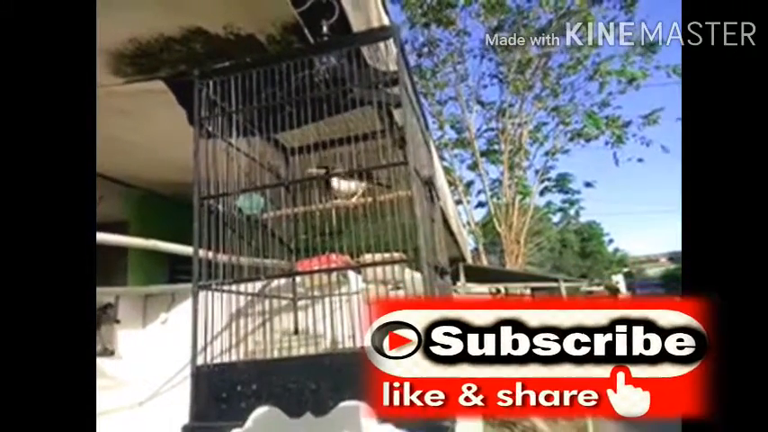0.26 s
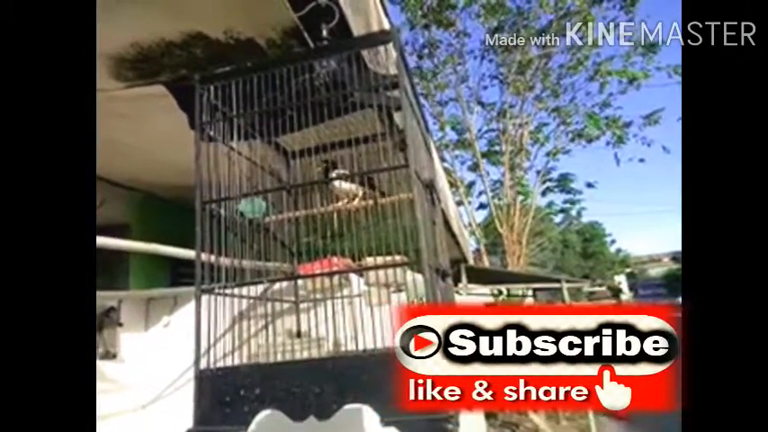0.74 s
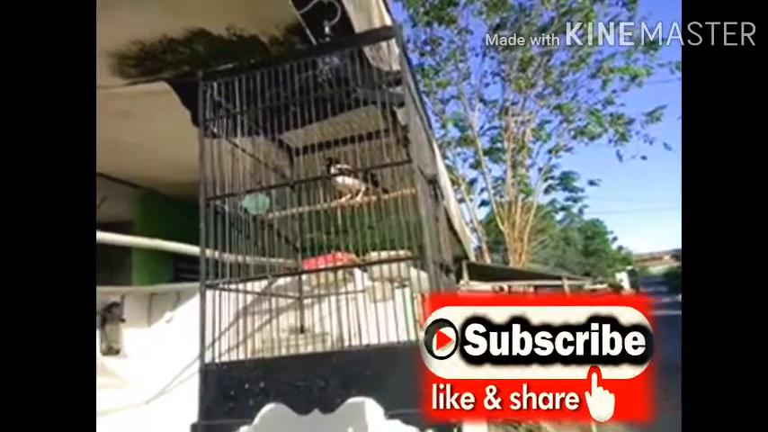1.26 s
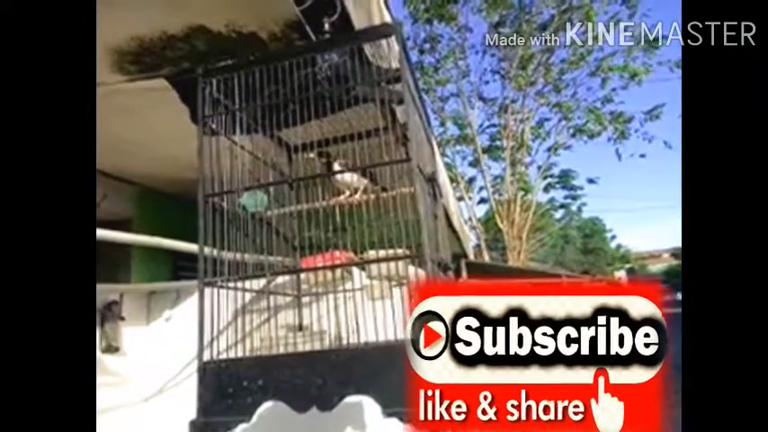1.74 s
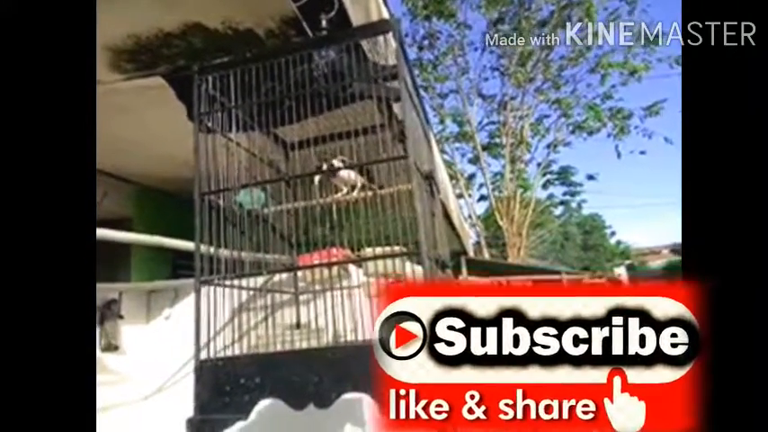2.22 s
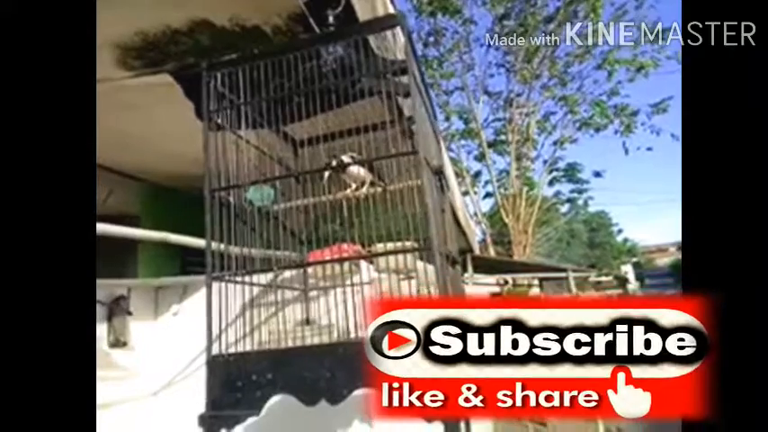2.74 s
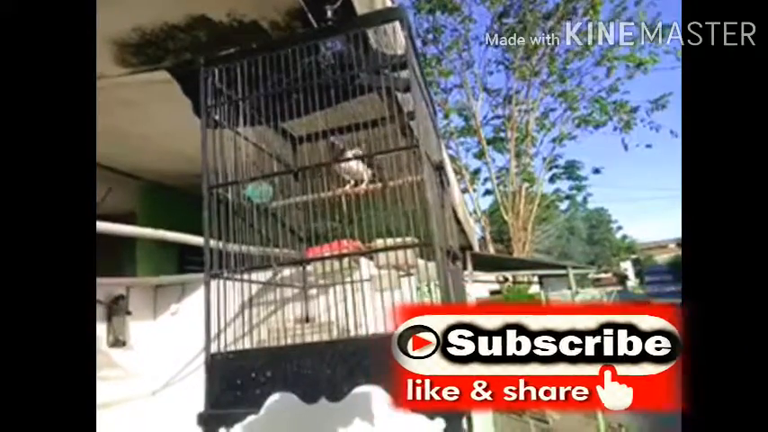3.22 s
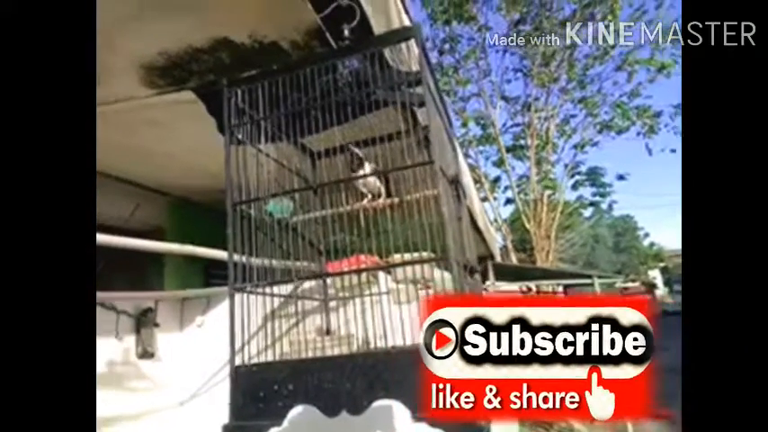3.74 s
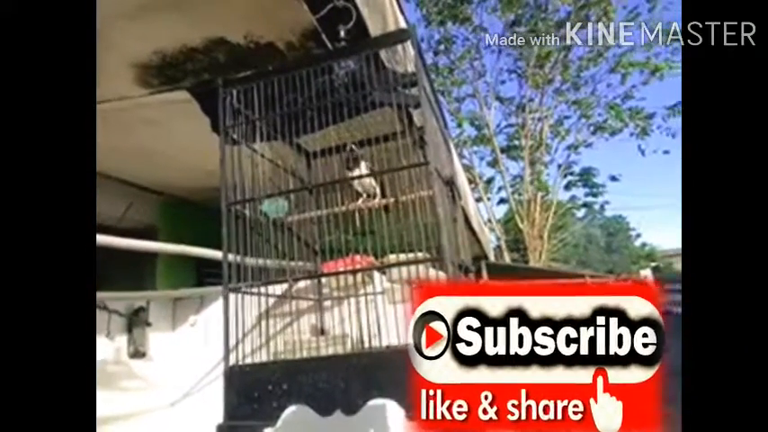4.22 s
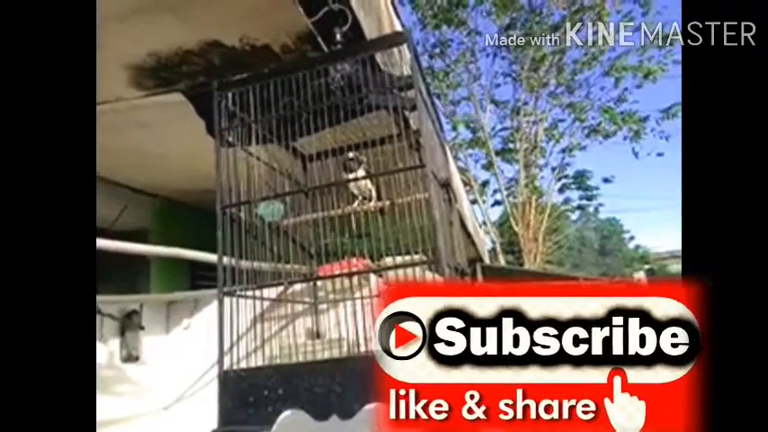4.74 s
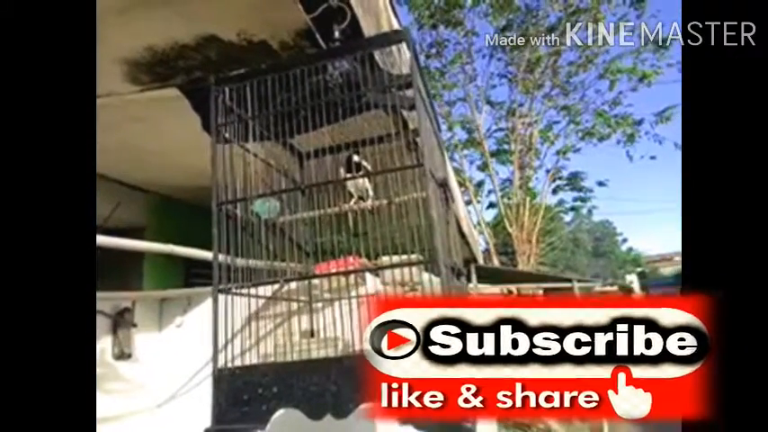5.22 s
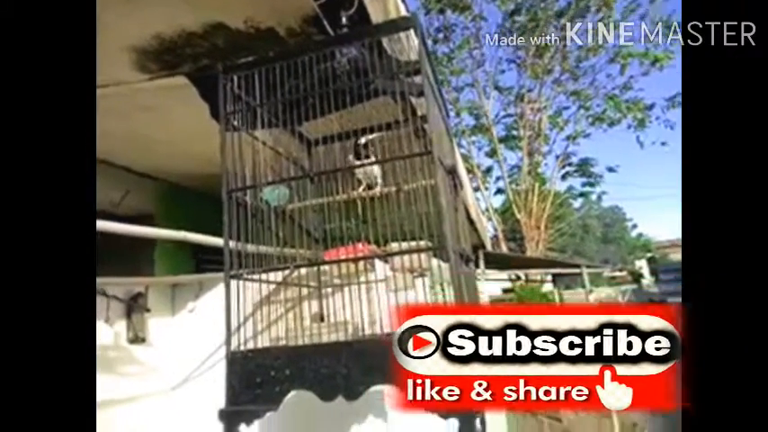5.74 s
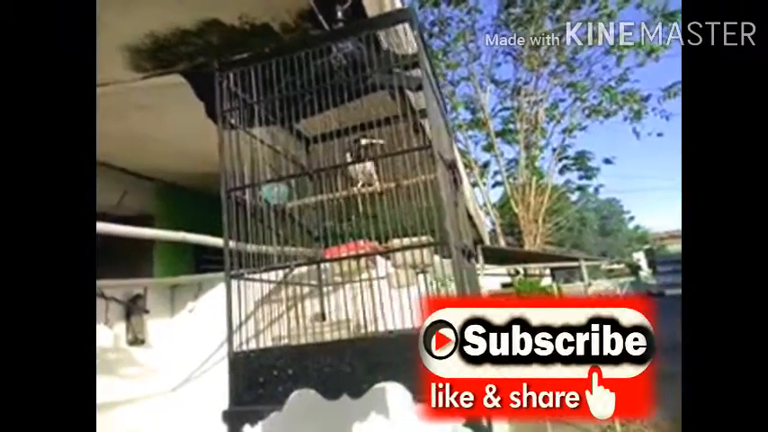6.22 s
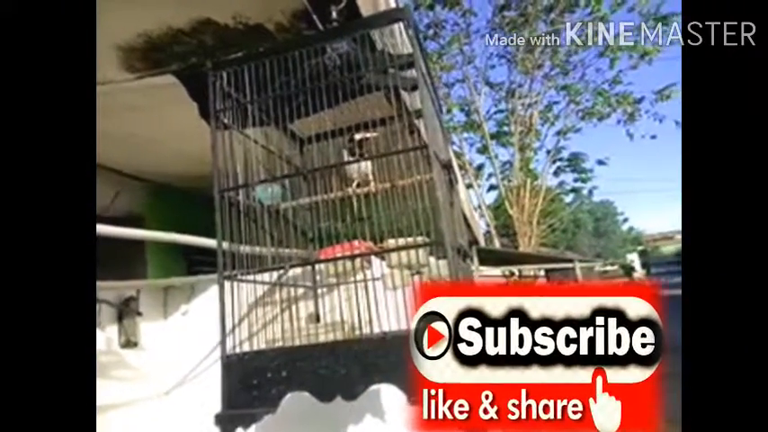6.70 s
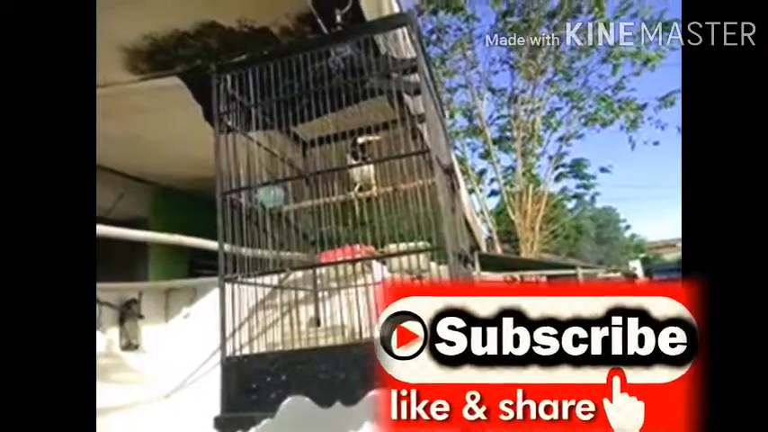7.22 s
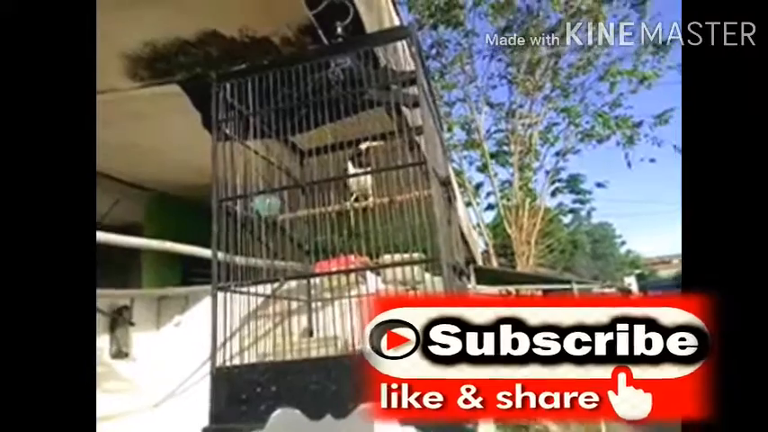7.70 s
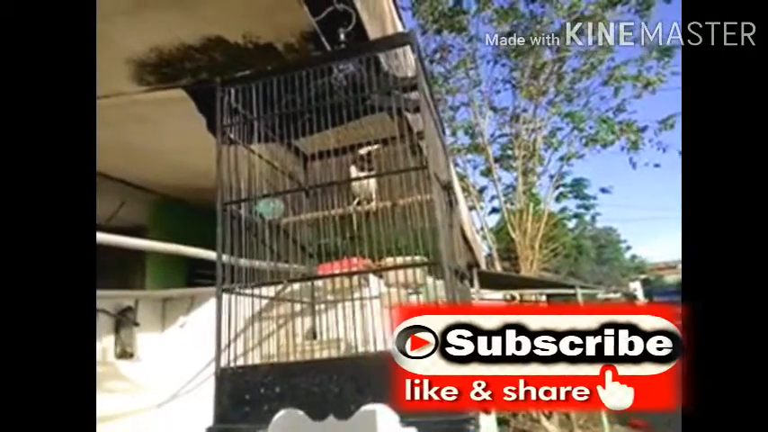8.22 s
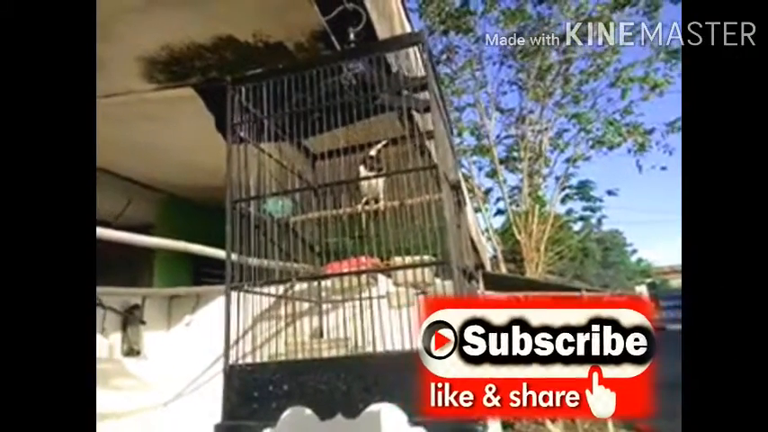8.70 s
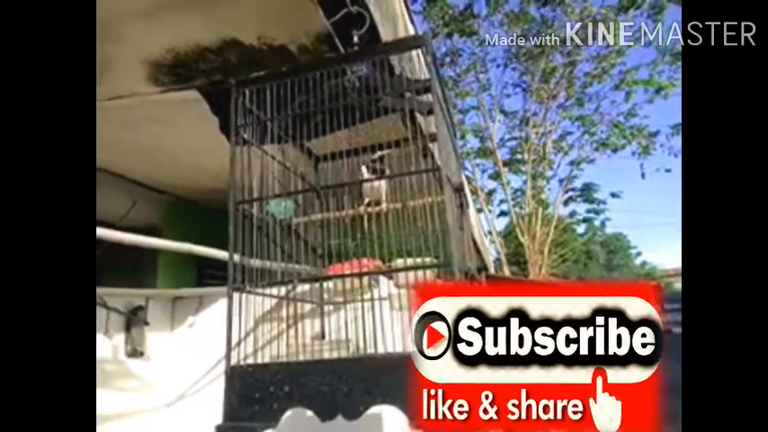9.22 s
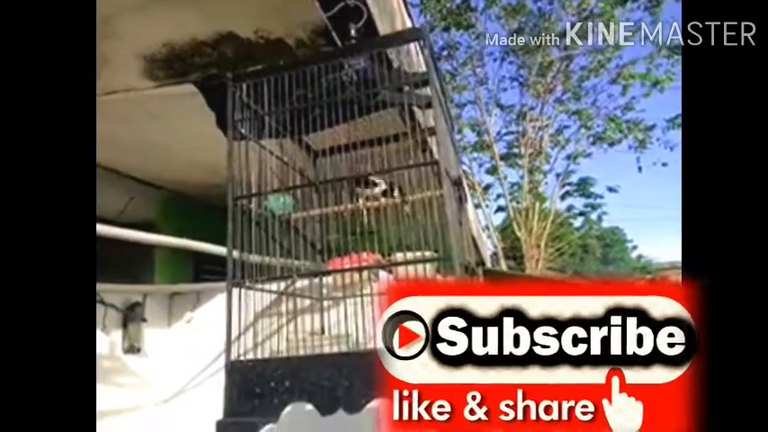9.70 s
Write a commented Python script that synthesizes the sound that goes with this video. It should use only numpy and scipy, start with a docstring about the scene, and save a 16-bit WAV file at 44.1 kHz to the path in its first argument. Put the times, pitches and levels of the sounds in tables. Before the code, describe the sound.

A caged bird gives five loud, brief whistled calls while a smaller bird peeps nearby, with cage ticks, distant roosters and a soft outdoor hush.

```python
"""Caged starling under a porch roof

A caged starling gives five loud notes, each climbed to from a soft lead-in and broken by flicks or a warble.
A smaller bird peeps and whistles, harsh downslurs and faint twitter lie beyond; all are gliding harmonics.
The cage ticks and rustles in shaped noise; two hoarse roosters and a dog sound far off as unsteady harmonics.
Porch and yard add discrete and diffuse echoes over an outdoor hush of filtered noise."""
import sys
import numpy as np
from scipy import signal
from scipy.fft import rfft, irfft, next_fast_len
from scipy.io import wavfile
from scipy.ndimage import uniform_filter1d, map_coordinates

SR = 44100
rng = np.random.default_rng(int(sys.argv[2]) if len(sys.argv) > 2 else 0)


def master(y):
    """Save y as 16-bit WAV."""
    cut = np.clip(np.atleast_2d(y).T, -1, 1)
    pcm = np.round(cut * 32767)  # scale
    wavfile.write(sys.argv[1], SR, pcm.astype(np.int16))


N = 438794

TIME = np.arange(N) / SR
# first echoes of roof, floor and wall: (delay/s, level/dB)
PORCH_ECHOES = [(.0043, -11), (0.0101, -5.5), (0.0259, -13.5)]


def undb(db):
    """Decibels to gain."""
    return 10 ** (np.asarray(db) / 20)


def unit(x):
    """Scale to rms 1."""
    return x / np.sqrt(np.mean(x ** 2) + 1e-18)


def add(out, start_s, x):
    """Mix x into out from a given time on."""
    i = int(np.clip(start_s * SR, 0, N - 1))
    out[i:i + len(x)] += x[:N - i]


def walk(size, rate):
    """Smooth chance with about `rate` turns a second, spread near 1."""
    place = np.arange(size) * rate / SR
    return map_coordinates(rng.standard_normal(int(place[-1]) + 2), [place], order=2, mode="nearest")


def noise(colour, size=N):
    """Noise of rms 1 with a spectrum of (Hz, dB) points."""
    hz, db = np.transpose(colour)
    n = next_fast_len(size)
    gain = undb(np.interp(np.log(np.fft.rfftfreq(n, 1 / SR) + 1), np.log(hz), db))
    return unit(irfft(rfft(rng.standard_normal(n)) * gain, n)[:size])


def gesture(rows, ease_s=0.0036):
    """Sample rows (s, values..) with rounded corners; returns the start time and one curve a column."""
    s, *columns = np.transpose(rows)
    s = np.sort(s)
    t = np.arange(s[0], s[-1] + ease_s / 2, 1 / SR)
    return s[0], *(uniform_filter1d(np.interp(t, s, c), int(ease_s * SR) + 1, mode="nearest") for c in columns)


def voice(hz, db, partials, jitter, jitter_rate, shimmer_db):
    """A vibrating membrane: harmonics on an unsteady pitch, with a soft start and stop."""
    n = len(hz)
    phase = 2 * np.pi * np.cumsum(hz * (1 + jitter * walk(n, jitter_rate))) / SR
    wave = sum(undb(part_db) * np.sin(k * phase) for k, part_db in partials)
    fade = signal.windows.tukey(n, min(1, 260 / n))
    return unit(wave) * fade * undb(db + shimmer_db * walk(n, jitter_rate))


def reverb(x, t60, gap_s):
    """Diffuse echo of equal power that starts after a gap and dies away."""
    t = np.arange(SR) / SR
    tail = rng.standard_normal(SR) * np.exp(-np.log(1000) * t / t60) * (t > gap_s)
    return signal.fftconvolve(x, tail / np.linalg.norm(tail))[:N]


def clock(length_s):
    """Time base: seconds since the start of an event, one value a sample."""
    return np.arange(int(max(length_s, .005) * SR)) / SR


def bump(t, width_s):
    """Gaussian pulse: a bell curve of height 1 round t = 0."""
    return np.exp(-(t / width_s) ** 2)


def hush():
    """Filtered noise: far traffic rumble and a faint wash whose bands swell and sink independently."""
    # spectrum of the rumble: (f/Hz, relative level/dB)
    rumble_colour = [(18, -43), (30, -21), (77, -0.5), (108, 2), (168, -0.5), (249, -7.5), (467, -11.5),
                     (709, -19.5), (1200, -18.5), (2130, -22), (3400, -15), (6500, -22), (8060, -42),
                     (12900, -56.5), (15500, -44.5)]
    rumble = noise(rumble_colour) * undb(-52 - 4 + 1.3 * walk(N, 3))
    wash = np.zeros(N)
    for hz in (450, 800, 1350):
        band = noise([(hz / 2, -35), (hz, 0), (hz * 2, -35)])
        wash += band * undb(-77 + 3.5 * walk(N, 5))
    return rumble + wash


def cage():
    """Near-field sources with diffuse reflection: rustles and ticks share one echo tail."""
    out = rustles() + ticks()
    return out + undb(-6) * reverb(out, t60=0.51, gap_s=0.0006)


def rustles():
    """Friction noise: feathers and feet hiss and scrape, with random grain and brief crackles."""
    # bouts: (t/s, length/s, relative level of the high hiss/dB, relative level of the broad scrape/dB)
    bouts = [(2.224, .12, -56.5, -57), (2.696, .25, -67, -63), (2.963, 0.0984, -62.5, -57.5),
             (3.672, 0.11, -57, -52), (4.421, .19, -65.5, -55.5), (4.661, .19, -77.5, -53.5),
             (5.021, 0.019, -75, -43), (5.209, .18, -51.5, -44), (5.489, 0.24, -66, -56.5),
             (5.739, 0.062, -52, -44.5), (5.846, 0.41, -72.5, -53), (6.619, 0.074, -53.5, -46.5),
             (6.718, 0.22, -64, -57), (6.99, 0.1, -53, -52.5), (8.156, 0.29, -74, -57),
             (8.753, 0.07, -50.5, -47), (8.88, 0.082, -54.5, -46.5), (8.987, 0.131, -66, -52),
             (9.176, 0.033, -63, -41), (9.303, .19, -65, -50.5), (9.529, 0.031, -50.5, -52),
             (9.605, .19, -70, -61)]
    # spectra: (f/Hz, relative level/dB)
    hiss_colour = [(1500, -13.5), (4000, -10.5), (6500, 8.5), (9000, -8.5), (12000, -20), (15000, -24.5)]
    scrape_colour = [(150, -21), (500, 2), (1500, 2), (3000, 2), (5000, 1.5), (7000, -9), (10000, -21),
                     (13500, -34.5), (15300, -12.5)]
    attack_s, release_s, sag_db = 0.0055, 0.02, -2  # sag over the length of a bout
    # feathers stir faintly between the bouts
    hiss, scrape = undb(-76 + 3 * walk(N, 4.7)), np.zeros(N)
    age = clock(1)
    for s, length, hiss_db, scrape_db in bouts:
        attack = 1 - np.exp(-age / attack_s)
        release = np.exp(-np.maximum(age - length, 0) / release_s)
        swell = attack * undb(sag_db * (age / length - .5)) * release
        add(hiss, s, undb(hiss_db) * swell)
        add(scrape, s, undb(scrape_db) * swell)
    grain = undb(2.9 * walk(N, 300) + 3.3 * walk(N, 35) - 4.0)
    # claws catch on the perch: about 110 random impulses a second, each decaying in 1.5 ms
    catches = (rng.random(N) < 110 / SR) * rng.exponential(size=N)
    crackle = signal.lfilter([.65], [1, -np.exp(-1 / (.0015 * SR))], catches)
    return grain * (.9 + crackle) * (hiss * noise(hiss_colour) + scrape * noise(scrape_colour))


def village():
    """Direct and diffuse sound: roosters and a dog with strong echo from the house walls."""
    crows, barks = roosters(), dog()
    direct = undb(-5) * crows + undb(-0.5) * barks
    crow_echo = undb(-2.5) * reverb(crows, t60=0.59, gap_s=0.0048)
    bark_echo = undb(-1.5) * reverb(barks, t60=0.51, gap_s=0.011)
    return direct + crow_echo + bark_echo


def roosters():
    """Harmonic voice with turbulence: two birds' hoarse syllables scoop up, sag and drop at the end."""
    # syllables: (t/s, length/s, f/Hz, relative level/dB, fade/(dB per s))
    syllables = [(0, 0.13, 719.6, -44.5, 73), (0.208, 0.89, 790.5, -44, 7),
                 (0.533, 0.084, 543.5, -33, 142.5), (0.798, 0.62, 562.2, -44.5, 3),
                 (1.481, 0.41, 562.8, -49.5, -3), (8.917, .25, 720, -42, 27), (9.216, 0.21, 786.2, -38, 26),
                 (9.42, .28, 775.5, -39, 19.5), (9.721, 0.2307, 720, -50.5, -11)]
    # resonances of the two throats: (multiple of the pitch, relative level/dB)
    high_throat = [(1, 2.5), (2, 7.5), (3, -52), (4, -6.5)]
    low_throat = [(1, 9.5), (1.5, 3.5), (2, 1.5), (2.5, -32), (3, -2.5)]
    # spectrum of the breath noise: (f/Hz, relative level/dB)
    hoarse_colour = [(350, -34), (650, 10.5), (1000, 0.5), (1550, 7.5), (2000, -18), (2600, -1.5),
                     (4000, -40)]
    attack_s, drop_s = 0.0175, 0.058
    scoop_share, sag_per_s, drop_share = 0.0482, .045, 0.088  # shares of pitch
    low_below_hz = 640
    out = np.zeros(N)
    for s, length, pitch_hz, db, fade_db in syllables:
        t = clock(length)
        onset, ending = np.exp(-t / attack_s), np.exp((t - length) / drop_s)
        drop = drop_share * min(length * 2, 1) * ending  # syllables under half a second drop less
        wander = 0.01983 * walk(len(t), 12)
        hz = pitch_hz * (1 - scoop_share * onset - sag_per_s * t - drop + wander)
        level_db = db - fade_db * t - 10 * onset + 2 * walk(len(t), 17.5)
        throat = low_throat if pitch_hz < low_below_hz else high_throat
        add(out, s, voice(hz, level_db, throat, jitter=.024, jitter_rate=170, shimmer_db=2.5))
        add(out, s, undb(level_db - 4) * noise(hoarse_colour, size=len(t)))
    return out


def small_bird():
    """Comb interference: whistles and peeps from close by, notched by the echo of the roof."""
    out = whistles() + peeps()
    roof = undb(-9.5) * np.interp(TIME - PORCH_ECHOES[0][0], TIME, out, left=0)
    return out + roof + undb(-13) * reverb(out, t60=.42, gap_s=.006)


def whistles():
    """Frequency glide: nearly pure notes rise to a top, break down to a shoulder, then plunge."""
    # notes: (t/s, length/s, break after/s, top f/Hz, shoulder f/Hz, top level/dB, shoulder level/dB)
    notes = [(0.029, 0.2, 0.14, 5106, 4590, -40.5, -26.5), (0.465, 0.2, 0.1214, 5214, 4690, -42, -32),
             (0.809, 0.12, 0.051, 5260, 5140, -41.5, -40), (1.524, 0.0876, 0.044, 4600, 4380, -35.5, -40),
             (1.962, .165, 0.064, 5034, 4660, -45, -43.5), (2.179, 0.1555, 0.059, 5270, 4610, -40.5, -28.5),
             (2.526, 0.14, 0.08, 5325, 5070, -40, -35.5), (4.74, 0.22, 0.07, 5250, 4560, -43, -27.5),
             (5.123, 0.16, 0.057, 5323, 4840, -42.5, -26.5)]
    from_hz, rise_s, onset_db = 3050, .018, -13
    end_hz, plunge_s, plunge_db = 2960, .021, -17
    break_width_s, break_dip_db = 0.0116, -9  # the voice thins as it steps down
    out = np.zeros(N)
    for s, length, break_s, top_hz, shoulder_hz, top_db, shoulder_db in notes:
        t = clock(length)
        stepped = (1 + np.tanh((t - break_s) / break_width_s)) / 2
        rise, plunge = bump(t, rise_s), np.exp((t - length) / plunge_s)
        hz = top_hz + (shoulder_hz - top_hz) * stepped
        hz += (from_hz - top_hz) * rise + (end_hz - shoulder_hz) * plunge
        db = top_db + (shoulder_db - top_db) * stepped
        db += break_dip_db * bump(t - break_s, 2 * break_width_s) + plunge_db * plunge + onset_db * rise
        add(out, s, voice(hz, db, [(1, 5.0), (2, -35.5)], jitter=0.00756, jitter_rate=150, shimmer_db=1.72))
    return out


def dog():
    """Irregular vibration: far barks rise and fall in pitch on strongly jittered harmonics."""
    # barks: (t/s, length/s, f/Hz, relative level/dB)
    barks = [(0.047, 0.098, 439, -44.5), (0.869, 0.097, 414.3, -42.5), (2.304, 0.038, 491.7, -44),
             (2.361, 0.045, 474, -42), (5.024, 0.0335, 498, -46), (5.083, 0.0264, 455, -39.5),
             (5.696, 0.046, 468.4, -43.5), (5.748, 0.0607, 488.7, -48.5), (8.206, 0.067, 529, -51)]
    # throat resonances: (multiple of the pitch, relative level/dB)
    throat = [(1, 4.5), (1.5, -3.5), (2, 0.5), (3, -6), (4, -16)]
    out = np.zeros(N)
    for s, length, pitch_hz, db in barks:
        start, hz, level_db = gesture([
            (s, .85 * pitch_hz, db - 7),
            (s + .4 * length, 1.08 * pitch_hz, db),
            (s + length, .95 * pitch_hz, db - 5)])
        add(out, start, voice(hz, level_db, throat, jitter=.12, jitter_rate=300, shimmer_db=3))
    return out


def twitter(count=16):
    """Superposition: scooped notes of distant birds, a few nearer ones among many faint ones."""
    # nearer notes: (t/s, length/s, lowest f/Hz, relative level/dB)
    nearer = [(0.115, 0.072, 3070, -52), (.43, 0.066, 3150, -55), (0.606, 0.067, 5410, -58),
              (0.829, 0.064, 5770, -57.5), (1.352, .061, 5540, -58.5), (1.433, .066, 2985, -55),
              (1.686, 0.077, 3170, -53), (5.318, 0.053, 2870, -53), (5.552, 0.05, 3330, -51),
              (6.19, 0.041, 2854, -51), (6.366, 0.11, 3020, -53.5), (7.029, 0.092, 3150, -54.5),
              (8.472, 0.066, 3100, -46.5), (8.674, 0.059, 2980, -51.5)]
    out = np.zeros(N)
    for s, length, low_hz, db in nearer:
        add(out, s, scoop(length, low_hz, db - 4.0))
    # one faint note at a random moment in each equal share of the time
    for k, (when, length, pitch, size) in enumerate(rng.random((count, 4))):
        start_s = (k + when) / count * N / SR
        low_hz = 3170 + 400 * (pitch - .4)
        add(out, start_s, scoop(.04 + .05 * length, low_hz, -63 + 5 * size))
    return out + undb(-10.5) * reverb(out, t60=0.21, gap_s=0.002)


def scoop(length, low_hz, db):
    """Parabolic glide: one note dips to its lowest pitch and rises again, softer at both ends."""
    ends = (2 * clock(length) / length - 1) ** 2
    hz = low_hz * (1 + .13 * ends)
    return voice(hz, db - 6 * ends, [(1, 7.5), (2, -25)], jitter=0.0063, jitter_rate=130, shimmer_db=6)


def starling():
    """Frequency modulation: a low lead-in climbs to a loud note that flicks upward or warbles into a rasp."""
    # calls: (lead-in t/s, loud note t/s, note length/s, climb/s, lead-in end f/Hz, note f/Hz,
    #         lead-in level/dB, note level/dB, flick/share of pitch, warble/share of pitch)
    calls = [(.33, 0.496, 0.027, 0.067, 1080, 2189, -44, -19, 0.017, 0.024),
             (2.099, 2.165, 0.084, 0.021, 2050, 2542, -43, -24, .27, 0.088),
             (3.716, 3.829, 0.0322, 0.0018, 1470, 2498, -42.5, -19, .15, 0.0065),
             (6.454, 6.543, .06, 0.0231, 1400, 2374, -44, -27, 0, 0.195),
             (7.941, 8.008, .106, 0.02, 2090, 2500, -40, -23.5, 0.36, 0.057)]
    # spectrum of the rasp: (f/Hz, relative level/dB)
    rasp_colour = [(400, -18), (1300, -8), (2500, 9.5), (3300, 9), (4200, -11.5), (5500, -0.5),
                   (8000, -33.5), (12000, -54.5)]
    # every lead-in swoops up, then drifts
    lead_from_hz, lead_crest_hz, lead_rise_s, lead_onset_db = 1120, 1856.7, .016, -6
    swell_db, release_s, release_db = 6, 0.012, -23.5
    closing_drop = 2.6  # share of pitch lost in the release, per share of warble
    flick_period_s, flick_settle_s, flick_dip_db = .0415, .0045, -34  # dip per share of pitch
    warble_hz, warble_slip = 64.29, 0.0677  # slip in cycles
    overtone_db, overtone_strain_db = -35.5, 56  # second harmonic; gain per share of flick and warble
    out = np.zeros(N)
    for s, note_s, length, climb_s, lead_hz, note_hz, lead_db, note_db, flick, warble in calls:
        end_s = note_s + length
        closing_hz = note_hz * (1 - closing_drop * warble)
        # corners: (time, pitch, level, effort)
        start, hz, db, effort = gesture([
            (s, lead_from_hz, lead_db + lead_onset_db, .5),
            (s + lead_rise_s, lead_crest_hz, lead_db, .5),
            (note_s - climb_s, lead_hz, lead_db, .5),
            (note_s, note_hz, note_db - swell_db / 2, 1),
            (end_s, note_hz, note_db + swell_db / 2, 1),
            (end_s + release_s, closing_hz, note_db + release_db, 1)])
        size, depth = len(hz), warble * effort
        age = start + np.arange(size) / SR - note_s
        # each flick throws the pitch up and lets it settle
        flicking = (age > 0) * (age < length - flick_settle_s)
        thrown = flick * np.exp(-(age % flick_period_s) / flick_settle_s) * flicking
        thrown = uniform_filter1d(thrown, size=64)
        # round crests and sharp dips, once a warble cycle
        cycles = warble_hz * age + warble_slip * walk(size, 50)
        swing = np.pi * np.abs(np.sin(np.pi * cycles)) / 2 - 1
        pitch = hz * (1 + thrown + depth * (swing + 0.32 * walk(size, 331.3)))
        level_db = db + flick_dip_db * thrown + depth * (10 * swing + 10 * walk(size, 169.2))
        second_db = overtone_db + overtone_strain_db * min(flick + warble, .24)
        partials = [(1, 3), (2, second_db), (3, -37.5), (4, -53.5)]
        note = voice(pitch, level_db, partials, jitter=0.0027, jitter_rate=300, shimmer_db=2.5)
        # the harder it flicks and warbles, the more the membrane breaks into a rasp
        strain = (depth + thrown) / 2
        flutter = 1 + strain * walk(size, 1000)
        rasp = strain * undb(db + 6.5) * noise(rasp_colour, size=size)
        add(out, start, note * flutter + rasp)
    short_echo = undb(-9.0) * reverb(out, t60=0.21, gap_s=0.01)
    long_echo = undb(-14) * reverb(out, t60=0.62, gap_s=.02)
    return porch(out) + short_echo + long_echo


def porch(x):
    """Comb interference: direct sound plus the first echoes, which notch a gliding note."""
    return x + sum(undb(db) * np.interp(TIME - delay, TIME, x, left=0) for delay, db in PORCH_ECHOES)


def peeps():
    """Joint pitch and amplitude shaping: arches loud on the flanks, thin on top, with a low closing note."""
    # calls: (t at the top/s, top f/Hz, duration relative to the usual peep, relative level/dB,
    #         closing note relative level/dB)
    calls = [(1.054, 5100, 0.92, -39.5, -9.5), (1.238, 5250, 0.64, -40.5, -3),
             (2.766, 5017, 0.79, -37, -19.5), (2.964, 5130, 0.82, -37.5, -7), (3.128, 5070, 1.1, -40, -9.5),
             (3.339, 5507, 1.05, -36.5, -2.5), (3.511, 5300, .91, -36, -7), (3.794, 5370, 1.4, -36.5, -14),
             (3.951, 5240, 0.94, -35, -4), (4.133, 5330, 0.93, -33, -4), (5.71, 5290, 1.296, -35, -7.5),
             (5.764, 5200, 1.5, -36.5, -13), (5.909, 5170, 0.89, -33.5, -7.5),
             (6.09, 4950, 0.92, -33.5, -25), (6.259, 5050, 1.02, -34.5, -7), (6.594, 5033, 1.05, -34, -11),
             (6.65, 4875, .78, -34.5, -2.5), (6.828, 4877, 0.86, -33, -2), (7.354, 5016, 1, -34.5, -6.5),
             (7.404, 4400, 0.75, -39.5, -13), (7.534, 4910, 0.86, -33.5, -8),
             (7.617, 4790, .95, -36, -19.5), (7.787, 4928, 0.72, -33.5, -16.5),
             (8.336, 4080, 0.44, -42, -20), (8.521, 4789, 0.66, -35, -23.5), (8.567, 4710, 0.67, -38, -27),
             (8.728, 4750, 0.66, -33.5, -16.5), (9.617, 4610, 1.08, -37, -13.5),
             (9.78, 4750, 0.79, -35, -19)]
    # times below are those of the usual peep; the pitch lifts three times: lilt, arch, closing note
    base_hz, arch_width_s, arch_thin_db = 2957, 0.016, -6
    arch_squareness = 3.21  # a round top with steep flanks
    opening_lead_s, opening_width_s, opening_lift_hz = 0.02576, 0.007275, 355
    closing_lag_s, closing_width_s, closing_lift = .042, .014, .25  # lift as a share of the arch
    half_s, sung_db, closing_trim_db = .028, -6.5, -0.5
    opening_db, fall_db, fall_lag_s = 0.5, -1, 0.0071  # tint the opening lilt and the falling flank
    before_s = 1.5 * half_s
    out = np.zeros(N)
    for s, top_hz, stretch, db, closing_db in calls:
        t = clock(stretch * (before_s + closing_lag_s + 2 * closing_width_s)) / stretch - before_s
        arch = np.exp(-np.abs(t / arch_width_s) ** arch_squareness)
        closing = bump(t - closing_lag_s, closing_width_s)
        opening = bump(t + opening_lead_s, opening_width_s)
        hz = base_hz + (top_hz - base_hz) * (arch + closing_lift * closing) + opening_lift_hz * opening
        accent_db = opening_db * opening + fall_db * bump(t - fall_lag_s, 0.012)
        sung = np.exp(-(t / half_s) ** 20) * undb(sung_db + arch_thin_db * arch ** 2 + accent_db)
        envelope = sung + closing ** 2 * undb(closing_trim_db + closing_db)
        note = voice(hz, db, [(1, 2.0), (2, -35)], jitter=0.015, jitter_rate=214.3, shimmer_db=4.0)
        add(out, s - stretch * before_s, envelope * note)
    return out


def yard_birds():
    """Exponential glide: short downslurs from further off, harsh with pitch jitter, with much echo."""
    # slurs: (t/s, first f/Hz, relative level/dB)
    slurs = [(2.041, 4320, -31), (7.165, 4430, -27), (8.918, 4390, -27)]
    length_s, end_hz, attack_s, fade_db = .045, 2550, 0.00523, -14
    out = np.zeros(N)
    for s, first_hz, db in slurs:
        t = clock(length_s)
        hz = first_hz * (end_hz / first_hz) ** (t / length_s)
        level_db = db - 20 * np.exp(-t / attack_s) + fade_db * t / length_s
        add(out, s, voice(hz, level_db, [(1, 7.5), (2, -37)], jitter=.035, jitter_rate=420, shimmer_db=3.5))
    return out + undb(-5) * reverb(out, t60=0.55, gap_s=0.0032)


def ticks():
    """Impact excitation: beak and claws strike the bars in fast-decaying noise with a lower knock."""
    # strikes: (t/s, relative level/dB, level of the low knock relative to the tick/dB before a +2.5 dB lift)
    strikes = [(2.973, -41.5, -28.5), (4.724, -37, -8.5), (4.776, -42.5, -12), (5.194, -39, -9),
               (5.505, -44, -3.5), (5.978, -27, -44), (6.033, -35.5, -25), (6.064, -35, -26),
               (7.972, -38.5, -13), (7.98, -36, -13), (8.731, -34, -15.5), (9.388, -39.5, -12.5),
               (9.554, -47.5, -1)]
    # spectra: (f/Hz, relative level/dB)
    tick_colour = [(800, -50), (2500, -2), (4700, 8.5), (6500, -0.5), (9000, -18.5), (15000, -24)]
    knock_colour = [(300, -10), (900, -12), (1400, 8), (1800, -9), (2600, -14.5), (8000, -67)]
    out = np.zeros(N)
    t = np.arange(2048) / SR
    attack = 1 - np.exp(-t / 0.00072)
    for s, db, knock_db in strikes:
        tick = noise(tick_colour, size=len(t)) * np.exp(-t / 0.0026)
        knock = noise(knock_colour, size=len(t)) * np.exp(-t / 0.0064)
        add(out, s, undb(db + 6.0) * (tick + undb(knock_db + 2.5) * knock) * attack)
    return out


def scene():
    """Superposition: all sources add at one microphone."""
    near = starling() + small_bird() + cage()
    far = yard_birds() + twitter() + village() + hush()
    return (near + far)[None]


def record(dry):
    """Envelope-following noise and low-pass filtering: high fizz tracks loudness; the top is cut steeply."""
    loudness = np.sqrt(np.abs(uniform_filter1d(dry[0] ** 2, size=256)))
    fizz_colour = [(1000, -58.5), (10000, -36), (13500, -19), (15200, -1.5), (16000, 2.0)]  # (f/Hz, dB)
    fizz = noise(fizz_colour) * loudness * undb(-35.5)
    top_cut = signal.ellip(10, .2, 70, 15600, fs=SR, output="sos")  # ripple and stop band in dB, edge in Hz
    return signal.sosfilt(top_cut, dry + fizz)


dry = scene()
out = record(dry)
master(out)
```